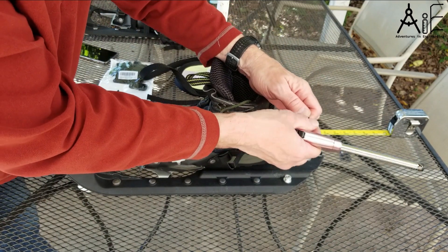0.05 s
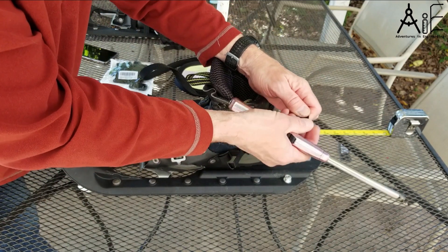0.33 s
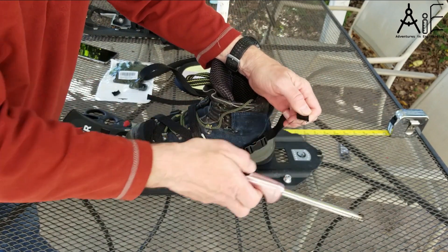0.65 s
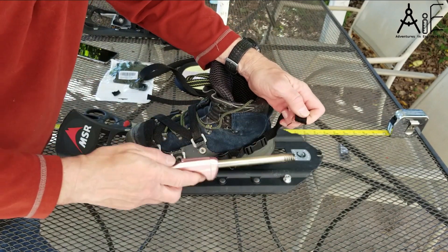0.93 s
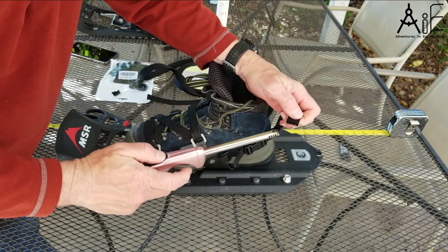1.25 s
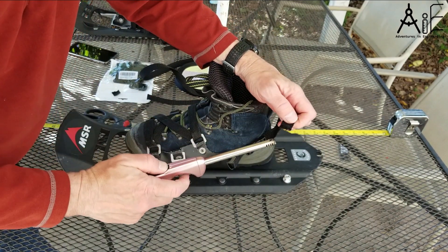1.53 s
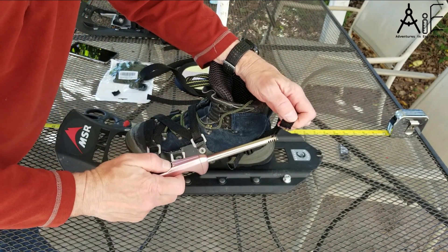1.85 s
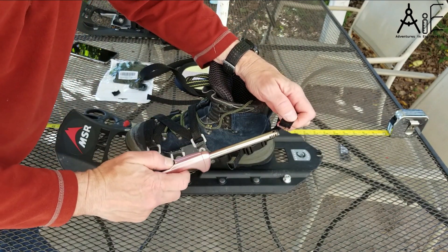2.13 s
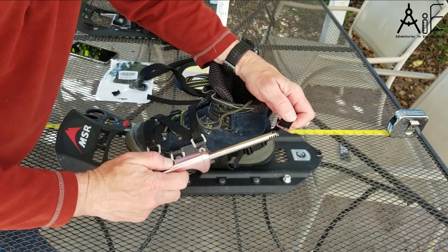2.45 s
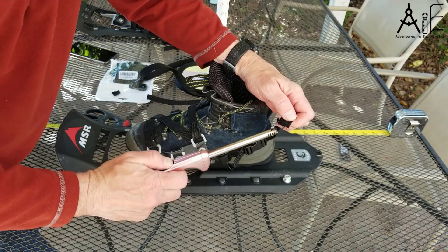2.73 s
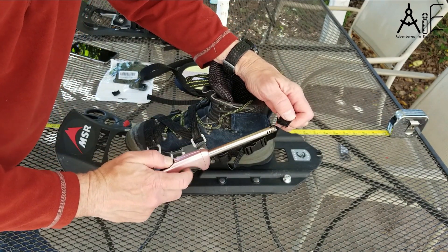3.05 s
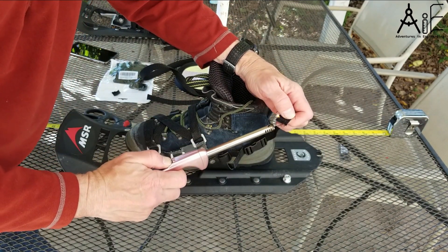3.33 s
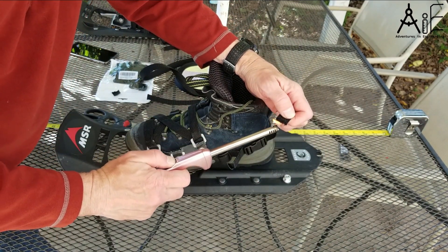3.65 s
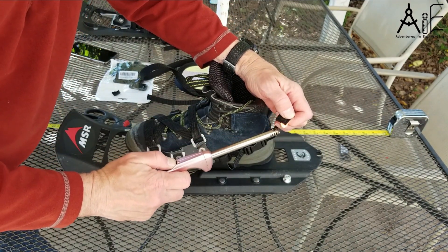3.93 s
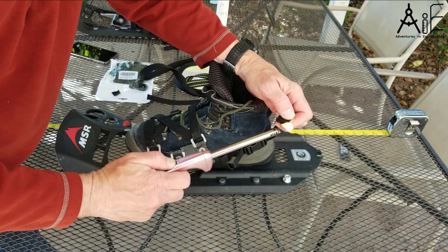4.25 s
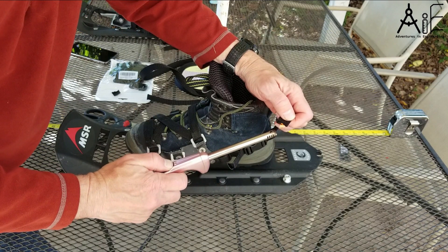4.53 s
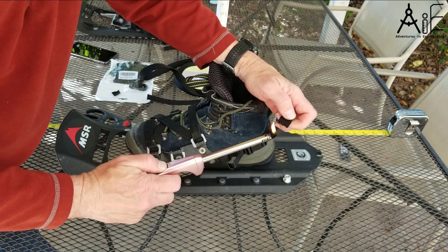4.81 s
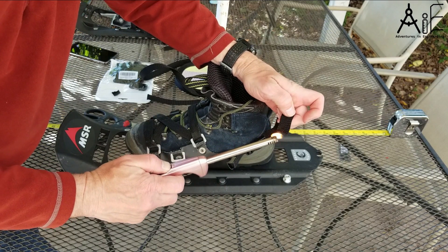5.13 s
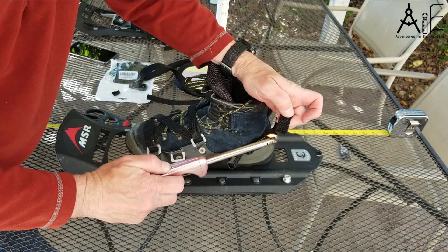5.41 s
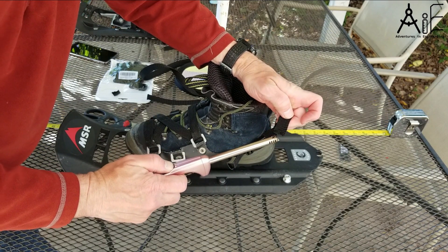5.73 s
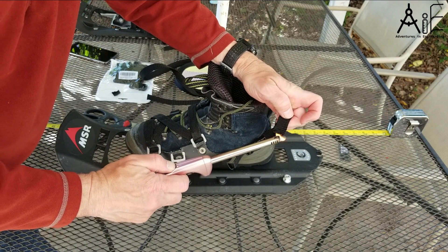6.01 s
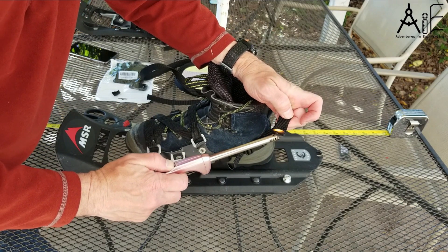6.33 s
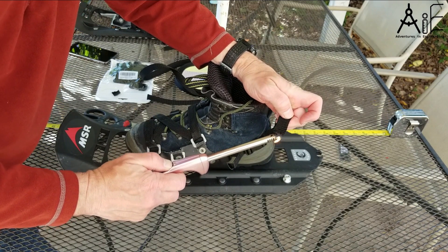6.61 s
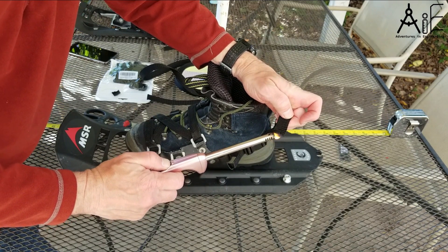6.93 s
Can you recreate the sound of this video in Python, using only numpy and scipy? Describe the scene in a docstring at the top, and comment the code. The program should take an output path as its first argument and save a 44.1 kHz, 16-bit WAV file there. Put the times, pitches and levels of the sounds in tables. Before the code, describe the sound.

Two far-off bangs, then four crisp clicks of a lighter's igniter on a quiet patio, ending with faint birds chirping.

```python
"""A patio among gardens, where a butane wand lighter is sparked four times over a table. The trigger
creaks in, the piezo hammer snaps and rings the shell, and the trigger springs back. Each snap overloads
the right microphone into a small thump and dies away quickly between the patio's walls. First, two far
bangs roll across the gardens; traffic and a distant engine drone throughout; birds sing at the end."""
import sys
import numpy as np
from scipy import signal
from scipy.fft import rfft, irfft, next_fast_len
from scipy.io import wavfile
from scipy.ndimage import map_coordinates

SR = 44100
rng = np.random.default_rng(int(sys.argv[2]) if len(sys.argv) > 2 else 0)


def store_wav(level_fs):
    """Save 16-bit WAV to argv[1]."""
    pcm = np.round(np.clip(np.atleast_2d(level_fs), -1, 1) * 32767)
    wavfile.write(sys.argv[1], SR, pcm.T.astype(np.int16))


N = 311875


def amp(db):
    """Decibels to gain."""
    return np.exp(np.asarray(db) * (np.log(10) / 20))


def unit(x):
    """Scale to rms 1."""
    return x / np.sqrt(np.mean(np.abs(x) ** 2) + 1e-20)


def along(points, hz):
    """Read a curve of (Hz, value) points on a log frequency axis."""
    point_hz, values = np.transpose(points)
    return np.interp(np.log(hz + 1), np.log(point_hz + 1), values)


def clock():
    """The time of each sample in seconds."""
    return np.arange(N) / SR


def curves(rows):
    """Automation lanes: one value per sample for each column after the time."""
    times, *columns = np.transpose(rows)
    return [np.interp(clock(), times, column) for column in columns]


def wobble(rate, size=N):
    """A smooth random curve, rate knots a second."""
    knots = rng.standard_normal(int(size * rate / SR) + 4)
    return map_coordinates(knots, [np.arange(size) * rate / SR])


def filtered(x, response):
    """Pass x through a complex frequency response."""
    size = next_fast_len(N + SR // 2, True)
    return irfft(rfft(x, size) * response(np.fft.rfftfreq(size, 1 / SR)), size)[..., :N]


def resonances(modes, f):
    """Causal response of (Hz, width in Hz, dB) modes of alternating polarity."""
    return sum((-1) ** k * amp(db) * 1j * f * width / (hz * hz - f * f + 1j * f * width)
               for k, (hz, width, db) in enumerate(modes))


def swell(t, rise, t60):
    """An envelope that grows up to t = 0, then falls 60 dB in t60 seconds."""
    attack = np.minimum(t, 0) / max(abs(rise), 1e-5)
    decay = np.log(1000) * np.maximum(t, 0) / t60
    return np.exp(np.maximum(attack - decay, -20))


def panning(pan, hz):
    """Left and right gains from (Hz, left minus right in dB) points."""
    return amp(np.outer([.5, -.5], along(pan, hz)))


def noise(spectrum, alike=((100, 0),), pan=((100, 0),)):
    """Stereo noise of rms 1 with a colour, a left-right likeness and a balance."""
    size = next_fast_len(N, True)
    hz = np.fft.rfftfreq(size, 1 / SR)
    spread = np.arccos(np.clip(along(alike, hz), -1, 1)) / 2
    coloured = rfft(rng.standard_normal((2, size))) * amp(along(spectrum, hz))
    mid, side = coloured * [np.cos(spread), np.sin(spread)]
    return unit(irfft(np.array([mid + side, mid - side]) * panning(pan, hz), size)[:, :N])


def noise_band(hz, width_hz):
    """A band of stereo noise of rms 1."""
    white = rng.standard_normal((2, N))
    return unit(filtered(white, lambda f: resonances([(hz, width_hz, 0)], f) ** 2))


# The colours of the three beds. Each row: frequency in Hz, relative level in dB.
RUMBLE_EQ = [(15, -12), (30, -4), (50, 0.5), (90, -3.5), (140, -13), (250, -27.5), (500, -57)]
TRAFFIC_EQ = [(80, -3.5), (150, 0), (260, -2), (330, -5), (420, -3), (600, -8.5), (1000, -13),
              (1600, -21.5), (3000, -28), (6000, -57.5)]
HISS_EQ = [(600, 2), (1500, 1.5), (2850, 6), (3400, -3), (4300, 8), (5500, -1), (7800, -3), (8200, -26),
           (9600, -11.5), (11000, -2), (15600, -2), (16200, -27.5)]
# Their fader rides. Each row: time in seconds, relative level in dB.
RUMBLE_RIDE = [(0, -60), (.8, -61), (2.1, -56), (3.1, -64.5), (4.4, -62), (5.3, -61), (5.65, -53.5),
               (6, -58.5), (7.07, -56)]
TRAFFIC_RIDE = [(0, -65), (1.05, -70), (1.5, -65.5), (2.1, -66), (2.6, -63.5), (3.7, -66), (4.25, -71),
                (5.4, -73), (5.7, -66.5), (6.2, -71), (7.07, -69)]
HISS_RIDE = [(0, -74.5), (1.3, -77.5), (2.2, -74.5), (3.9, -82.5), (5.1, -81.5), (5.9, -77.5), (7.07, -79)]
# Their stereo width. Each row: frequency in Hz, left-right correlation.
AIR_ALIKE = [(60, 0.83), (100, 1), (180, 0.82), (310, 0.55), (550, 0.34), (950, -0.3), (1650, -0.14),
             (2860, 0.076), (4970, 0.12), (8640, 0.076), (15000, 0.02)]
# Their balance. Each row: frequency in Hz, left minus right in dB.
AIR_PAN = [(50, -2), (400, -3.5), (1000, -5), (2000, 0), (4400, 5.5), (5500, -4.5), (7800, -17.5),
           (9000, 2.5), (14000, 1.5)]

def outdoors(rumble_db=3, traffic_db=2, hiss_db=6):
    """The ambience bed: low rumble, the wash of far traffic and a thin hiss."""
    (low,), (middle,), (high,) = curves(RUMBLE_RIDE), curves(TRAFFIC_RIDE), curves(HISS_RIDE)
    rumble = amp(low + rumble_db + 2 * wobble(8)) * noise(RUMBLE_EQ, AIR_ALIKE, AIR_PAN)
    traffic = amp(middle + traffic_db + .896 * wobble(2.1)) * noise(TRAFFIC_EQ, AIR_ALIKE, AIR_PAN)
    hiss = amp(high + hiss_db) * noise(HISS_EQ, AIR_ALIKE, AIR_PAN)
    return rumble + traffic + hiss


# Cars crossing a far stretch of road. Each row: peak time and half-length in seconds, level in dB.
CAR_PASSES = [(2.103, .13, -65.5), (3.953, 0.26, -65.5), (4.952, 0.1, -68)]

def tyres(hz=415, width_hz=35):
    """Far tyres sing in a narrow band, swelling and fading with each pass."""
    level = sum(amp(db) * np.exp(-((clock() - s) / length) ** 2) for s, length, db in CAR_PASSES)
    return level * noise_band(hz, width_hz) * amp([[-2], [2]])


# The engine's revs. Each row: time in seconds, firing rate in Hz, relative level in dB.
ENGINE_REVS = [(0, 58.75, -57), (.95, 60, -69.5), (1.55, 61.84, -46.5), (1.75, 79.1, -51), (2.3, 86, -53),
               (3.1, 84.9, -56), (3.6, 85.7, -65.5), (4.2, 80.5, -68), (4.5, 58.6, -55), (4.85, 52, -58),
               (5.3, 62.02, -61), (5.65, 76, -52), (6.1, 79.05, -68.5), (7.07, 81.8, -54)]
# Its harmonics. Each row: multiple of the firing rate, gain in dB.
ENGINE_HARMONICS = [(1, 2.5), (2, -13), (3, -21), (4, -25), (5, -27), (6, -26)]

def engine():
    """A far vehicle changes speed; mostly its firing note carries."""
    hz, db = curves(ENGINE_REVS)
    phase = 2 * np.pi * np.cumsum(hz * (1 + .0096 * wobble(15))) / SR
    drone = sum(amp(db + gain_db + 3.4 * wobble(12)) * np.sin(k * phase)
                for k, gain_db in ENGINE_HARMONICS)
    return drone * amp([[-1], [1.5]])


def whistle(hz, rasp):
    """A bird's pure tone; a quick waver, rasp as a share of the pitch, roughens it."""
    wavering_hz = hz * (1 + rasp * wobble(400, size=len(hz)))
    return np.sin(2 * np.pi * np.cumsum(wavering_hz) / SR)


# A second bird's high peep, then short chirps and a rising whistle. Each row: start and length in
# seconds, starting, middle and ending pitch in Hz, level in dB, rasp as a share of the pitch.
BIRD_CALLS = [(5.356, .08, 6800, 6833, 7180, -75, 0.0083), (5.415, 0.036, 4296, 4130, 3888, -67.5, .05),
              (5.479, .04, 4900, 5560, 5900, -67, .06), (5.61, .245, 2750, 3340, 3680, -61, .018)]
# One falling whistle of the trill. Each row: time in seconds, pitch in Hz, relative level in dB.
TRILL_SLUR = [(0, 4400, -22), (.014, 4300, 1), (.036, 3950, 4.5), (.048, 3250, -4.5), (.062, 2801, -1),
              (.085, 2380, -13.5)]
# The second bird's later peeps. Each row: start in seconds, level in dB.
PEEPS = [(5.94, -75), (6.101, -72.5), (6.27, -75), (6.407, -73), (6.7, -73)]

def birds(trill_s=5.981, step_s=.1535, trill_db=-62, crescendo_db=6, gather_s=.0048, echo_t60=.45):
    """One bird slurs up, then trills six falling notes; another peeps. Only the trees' echo is heard."""
    song = np.zeros(N + SR)
    peeps = [(s, .05, 7180, 7200, 7900, db, .012) for s, db in PEEPS]  # laid out like BIRD_CALLS
    for s, length, *pitch_hz, db, rasp in BIRD_CALLS + peeps:
        progress = np.linspace(0, 1, int(length * SR))
        hz = np.polyval(np.polyfit([0, .5, 1], pitch_hz, 2), progress)
        envelope = amp(db + crescendo_db * (progress - .5)) * np.abs(np.sin(np.pi * progress)) ** .5
        song[int(s * SR):][:len(hz)] += envelope * whistle(hz, rasp)
    slur_hz, slur_db = np.array(curves(TRILL_SLUR))[:, :int(TRILL_SLUR[-1][0] * SR)]
    for s in trill_s + step_s * np.arange(6):
        song[int(s * SR):][:len(slur_hz)] += amp(trill_db + slur_db) * whistle(slur_hz, rasp=.06)
    t = np.arange(SR // 2) / SR
    trees = rng.standard_normal((2, len(t))) * swell(t - gather_s, gather_s, echo_t60)
    return signal.fftconvolve(song[None, :N], trees / np.linalg.norm(trees[0]), axes=1)[:, :N]


# Two far bangs. Each row: start in seconds, relative level in dB.
BANGS = [(0.017, -38.5), (0.455, -36)]
# The colour of their scattered echo. Each row: frequency in Hz, relative level in dB.
BOOM_EQ = [(70, -26), (115, -19.5), (150, 2), (200, -7), (245, -4.5), (290, -20.5), (360, -7.5), (680, -12),
           (800, -17.5), (1050, -14.5), (1300, -16), (2800, -21), (5000, -36.5), (9000, -59)]
# Its stereo width. Each row: frequency in Hz, left-right correlation.
BOOM_ALIKE = [(130, 1), (290, 0.61), (640, 0.0083), (1400, -0.3), (3000, 0.056)]
# The yards' ring. Each row: frequency and bandwidth in Hz, gain in dB.
YARD_MODES = [(152, 28, -0.5), (240.5, 30, -5), (349.2, 16, 0), (593, 17, -10), (676, 8.8, -2.5),
              (1037, 23, -8)]

def bangs(push_hz=152, push_db=1, crest_s=.052, t60=.44, roll_db=-19, roll_t60=1.0, yards_db=-4):
    """A far bang arrives dull, round the houses; brighter echoes pile up, by the same paths each time."""
    push, echo = np.zeros(N), np.zeros((2, N))
    yards = lambda f: resonances(YARD_MODES, f) / (1 + (f / 2000) ** 4)
    ringing = unit(filtered(rng.standard_normal(N), yards))
    scatter = noise(BOOM_EQ, BOOM_ALIKE) + amp(yards_db) * ringing
    paths = unit(scatter * amp(wobble(160)))  # a slightly lumpy tail
    for s, db in BANGS:
        t = np.maximum(clock() - s, 0)
        push += amp(db + push_db) * np.sin(2 * np.pi * push_hz * t) * swell(t - .013, .012, .062)
        fade_in = np.minimum(t / .011, 1)
        roll = swell(t - crest_s, .028, t60) + amp(roll_db) * swell(t - crest_s, .018, roll_t60)
        echo += amp(db) * fade_in * roll * np.roll(paths, int(s * SR), axis=1)
    return (push + echo) * amp([[-1.1], [1.1]])


# Sleeve and hand moves. Each row: peak time and half-length in seconds, centre in Hz, level in dB.
RUSTLES = [(1.295, 0.1, 4020, -79), (1.53, 0.31, 4240, -72), (3.843, 0.031, 2050, -74),
           (5.68, 0.08, 1130, -74), (5.67, 0.08, 334, -64)]
# Nudges of the table. Each row: start in seconds, level in dB.
TABLE_BUMPS = [(0.763, -40), (4.483, -41)]

def handling(cloth_width=.4, bump_hz=52, bump_t60=.11):
    """Cloth brushes in soft swells, and the table takes a dull nudge now and then."""
    out = np.zeros((2, N))
    for s, length, hz, db in RUSTLES:
        out += amp(db) * np.exp(-((clock() - s) / length) ** 2) * noise_band(hz, cloth_width * hz)
    for s, db in TABLE_BUMPS:
        t = np.maximum(clock() - s, 0)
        out -= amp(db) * np.sin(2 * np.pi * bump_hz * t) * swell(t - .01, .008, bump_t60)
    return out


# The colour of the patio's reverb. Each row: frequency in Hz, relative level in dB.
PATIO_EQ = [(150, -16.5), (550, -5.5), (900, -18), (1250, -12.5), (1480, -2), (1900, -6), (3000, -1.5),
            (3650, 2.5), (4900, -3.5), (6300, 2), (7700, -1.5), (9200, -9.5), (10700, 1), (15500, 0.5),
            (16100, -17.5)]
# Its balance, shared by the handle's ring. Each row: frequency in Hz, left minus right in dB.
PATIO_PAN = [(1000, 1), (4500, -7), (5500, -3), (6500, -4), (8000, -12), (9200, -3), (13000, 2),
             (15400, -4)]

def patio(hits, t60=.145, late_t60=.37, late_db=-21, send_db=-12.2):
    """Furniture and walls scatter each snap into a short, bright tail."""
    out = np.zeros((2, N))
    paths = noise(PATIO_EQ, pan=PATIO_PAN)  # the hand hardly moves, so the paths repeat
    for s, db, _ in hits:
        t = clock() - s - .005
        tail = swell(t, .003, t60) + amp(late_db) * swell(t, .003, late_t60)
        out += np.roll(paths, int(s * SR), axis=1) * amp(db + send_db) * (clock() > s) * tail
    return out


# The finger takes up the slack; later the hammer's catch gives.
# Each row: time in seconds, relative level in dB.
GRIPS = [(1.6451, -51.5), (2.1565, -41), (2.6133, -50.5), (3.0867, -50.5)]
CATCHES = [(1.7474, -42), (2.2093, -45.5), (2.6746, -44), (3.1581, -43.5)]
# The trigger springs back to its stop. Each row: hit in seconds, relative level in dB, travel in seconds.
RELEASES = [(2.0366, -38.5, 0.024), (2.4994, -43, .0285), (2.972, -40.5, .0286)]
# The voice of each contact: treble in dB, hollow ring in dB, slide-in in seconds.
GRIP_TONE, CREAK_TONE, CATCH_TONE = (-1, -10, .00038), (-5.5, -4.5, .001), (-13, -2.5, .0003)
UNSTICK_TONE, STOP_TONE, REBOUND_TONE = (0, -19, .00076), (1, -16, .0022), (-20, -5, .0011)

def contacts(creaks=3, creak_db=-58, slip_lead_s=.022, slip_db=-51,
             unstick_db=-16, rebound_s=.0105, rebound_db=-9.5):
    """The cue list: a pull grips, creaks, slips and catches; a release unsticks, hits and rebounds."""
    cues = []
    for (grip_s, grip_db), (catch_s, catch_db) in zip(GRIPS, CATCHES):
        slip_s = catch_s - slip_lead_s  # the spring slips once before the catch
        cues += [(grip_s, grip_db, *GRIP_TONE),
                 (slip_s, slip_db, *CREAK_TONE),
                 (catch_s, catch_db, *CATCH_TONE)]
        for k in range(creaks):  # smaller slips along the way
            travel = (k + rng.random()) / creaks
            creak_s = grip_s + travel * (slip_s - grip_s)
            cues.append((creak_s, creak_db + 2.5 * rng.standard_normal(), *CREAK_TONE))
    for s, db, travel_s in RELEASES:
        cues += [(s - travel_s, db + unstick_db, *UNSTICK_TONE),
                 (s, db, *STOP_TONE),
                 (s + rebound_s, db + rebound_db, *REBOUND_TONE)]
    return cues


# The plastic handle's ring. Each row: frequency and bandwidth in Hz, gain in dB.
HANDLE_MODES = [(1500, 400, 0.5), (2440, 700, -2.5), (3670, 600, 1.5), (4420, 800, 3.5), (5000, 800, 4),
                (7200, 1724, -3.5)]
# A tick's crisp edge. Each row: frequency in Hz, relative level in dB.
EDGE_EQ = [(1500, -25), (5500, -2), (8000, -3.5), (9200, -4.5), (10500, 1.5), (15000, -1.5), (16300, -16.5)]

def trigger(tick_t60=.006, room_t60=.2, room_db=-15, edge_db=-3,
            hollow_hz=1500, hollow_width_hz=400, hollow_t60=.046, hollow_db=-2):
    """The trigger catches in the plastic handle with sharp ticks; each also rattles its hollow."""
    body, edge, rattle = np.zeros((3, N))
    now = clock()
    for s, db, treble_db, ring_db, slide_s in contacts():
        near = slice(int(s * SR) - SR // 10, int(s * SR) + SR // 2)
        t = now[near] - s - .0006
        touch = amp(db) * (swell(t, slide_s, tick_t60) + amp(room_db) * swell(t, slide_s, room_t60))
        body[near] += touch
        edge[near] += touch * amp(treble_db + edge_db)
        rattle[near] += amp(db + ring_db + hollow_db) * swell(t, slide_s, hollow_t60)
    handle = lambda f: unit(resonances(HANDLE_MODES, f)) * panning(PATIO_PAN, f)
    cavity = lambda f: unit(resonances([(hollow_hz, hollow_width_hz, 0)], f) ** 2)
    plastic = filtered(body * rng.choice([-1, 1], (2, N)), handle)
    hollow = filtered(rattle * rng.choice([-1, 1], N), cavity)
    return plastic + hollow + edge * noise(EDGE_EQ)


def thumps(hits, swing_hz=57, life_s=.018, spike_db=2, spike_s=.00053, left_db=-28):
    """Each snap jolts the right microphone, which swings back in one slow, dying wave."""
    right = np.zeros(N)
    for s, _, db in hits:
        spike = amp(spike_db) * np.exp(-((clock() - s - .001) / spike_s) ** 2)
        t = np.maximum(clock() - s - .0015, 0)
        swing = np.sin(2 * np.pi * swing_hz * t) * np.exp(-(t / life_s) ** 2)
        right += amp(db) * (spike - swing)
    return np.array([amp(left_db) * right, right])


# The piezo hammer's hits. Each row: start in seconds, snap level in dB, thump level in dB.
SNAPS = [(1.773, -17, -22), (2.2329, -18, -22), (2.6948, -18, -23.5), (3.1812, -17, -19)]
# The ring of shell and wand. Each row: frequency and bandwidth in Hz, left and right gain in dB.
SHELL_MODES = [(1492, 250, 0, 3), (2650, 600, -9.5, -4), (3600, 290, 9, -1), (4370, 320, 4, -2),
               (5600, 710, -3, 2), (6100, 360, -10.5, 11.5), (7460, 800, -5, 11), (10600, 1000, 2.5, 4.5),
               (12100, 820, 9.5, 10.5), (14300, 1100, 8, 0.5), (14756, 230, 3.5, 7), (15000, 600, 11, 8.5)]
# The colour of the jolted microphone port. Each row: frequency in Hz, relative level in dB.
JOLT_EQ = [(100, -3.5), (300, -7.5), (480, 0), (780, -14), (1200, -11), (2500, -18), (5000, -37)]

def snaps(chatter_s=.0011, hammer_t60=.007, table_s=.0075, table_db=-14, table_t60=.019, jolt_db=-15):
    """The hammer chatters on the crystal and rings the shell; the table top mirrors it."""
    force = np.zeros(N)
    for s, db, _ in SNAPS:
        t = clock() - s
        attack = np.clip(t / .0003, 0, 1)
        force += amp(db) * attack * swell(np.maximum(t - chatter_s, 0), 1, hammer_t60)
        force += amp(db + table_db) * swell(t - table_s, .0002, table_t60)
    sides = [[(hz, width, gains[side]) for hz, width, *gains in SHELL_MODES] for side in range(2)]
    chatter = force * rng.choice([-1, 1], (2, N))
    shell = filtered(chatter, lambda f: unit(np.array([resonances(modes, f) for modes in sides])))
    jolt = force * amp(jolt_db) * noise(JOLT_EQ, pan=[(500, -18.5)])
    return shell + jolt


def scene():
    """The lighter close by, the neighbourhood far behind it."""
    foreground = snaps() + thumps(SNAPS) + patio(SNAPS) + trigger() + handling()
    return foreground + bangs() + engine() + tyres() + birds() + outdoors()


def record(dry):
    """A steep high cut takes the very top off the mix."""
    cutoff_hz = 16350
    return filtered(dry, lambda hz: 1 / np.sqrt(1 + (hz / cutoff_hz) ** 120))


dry = scene()
out = record(dry)
store_wav(out)
```